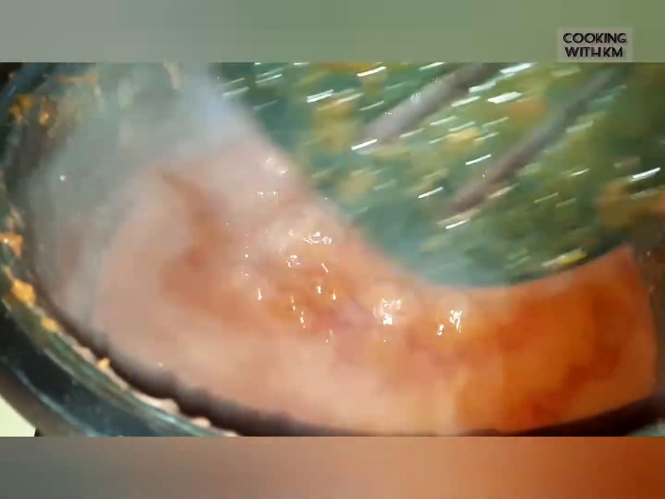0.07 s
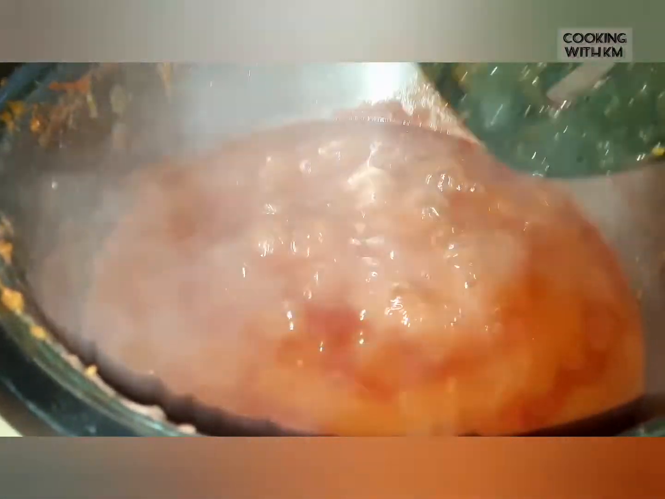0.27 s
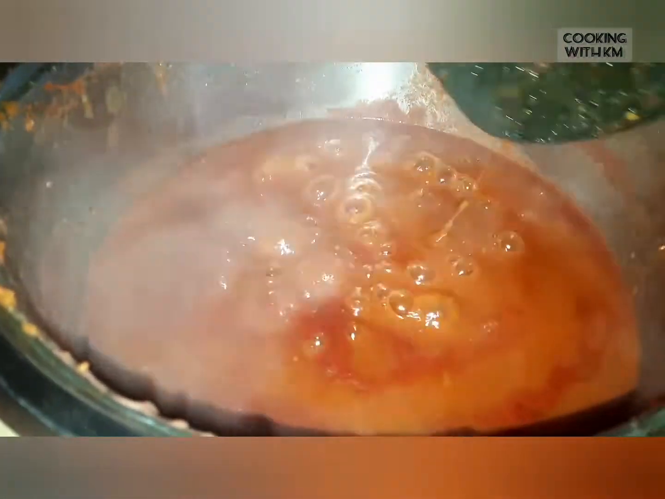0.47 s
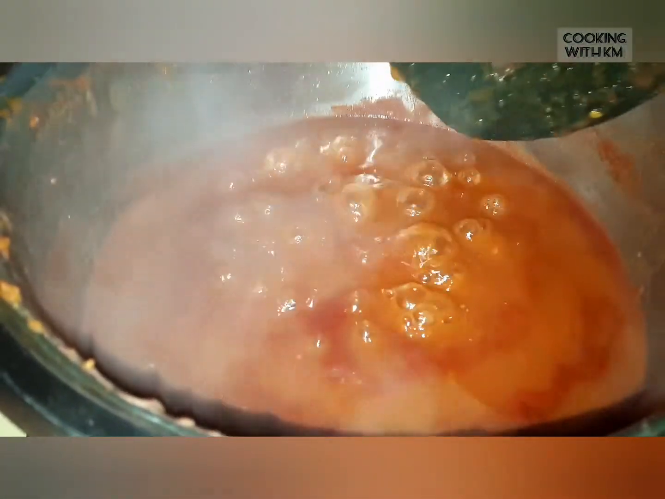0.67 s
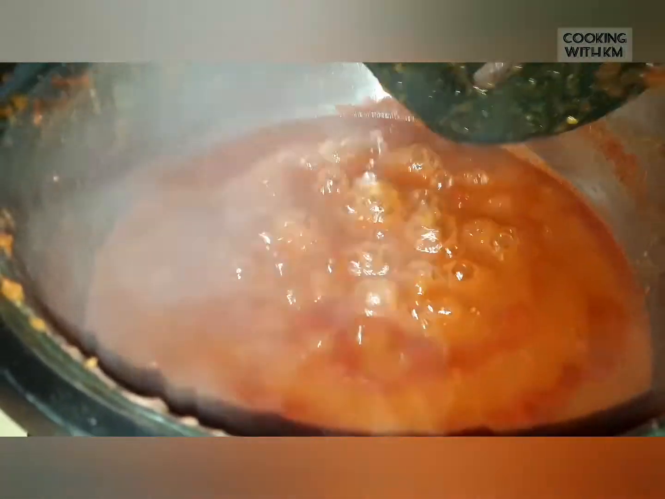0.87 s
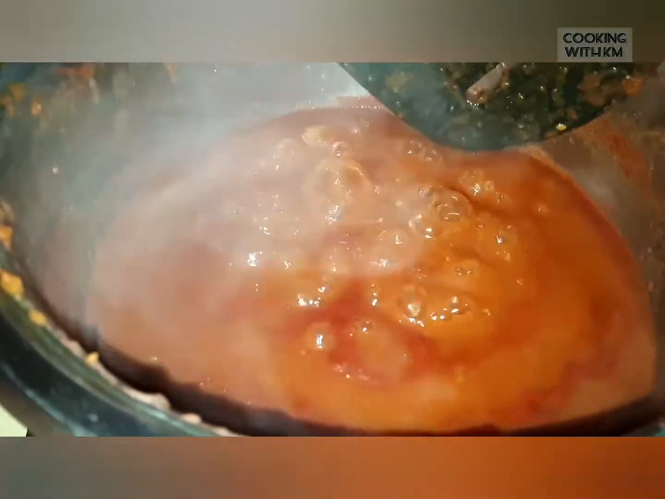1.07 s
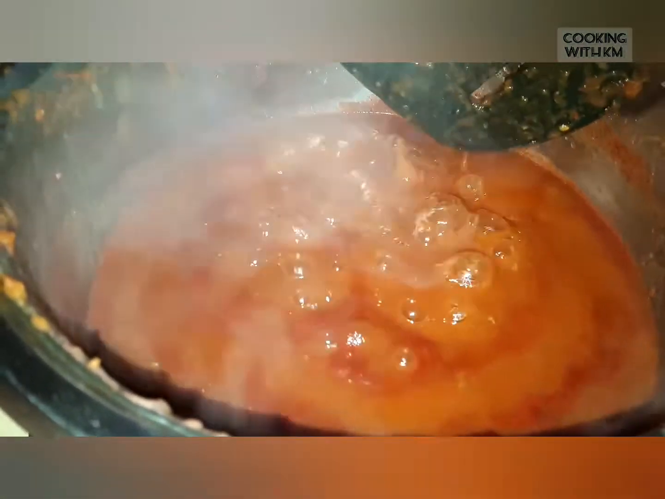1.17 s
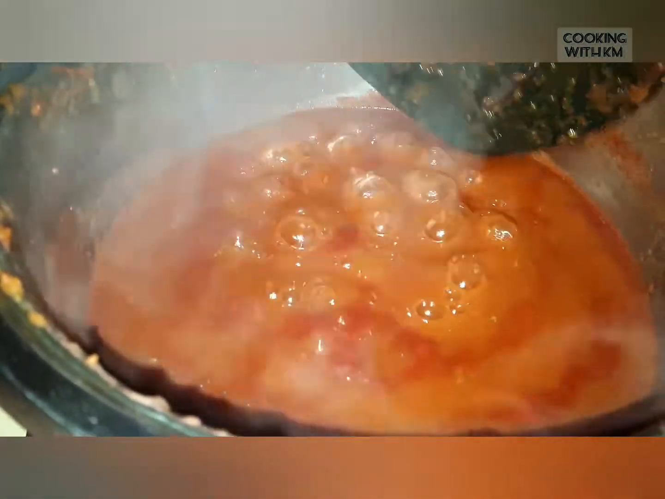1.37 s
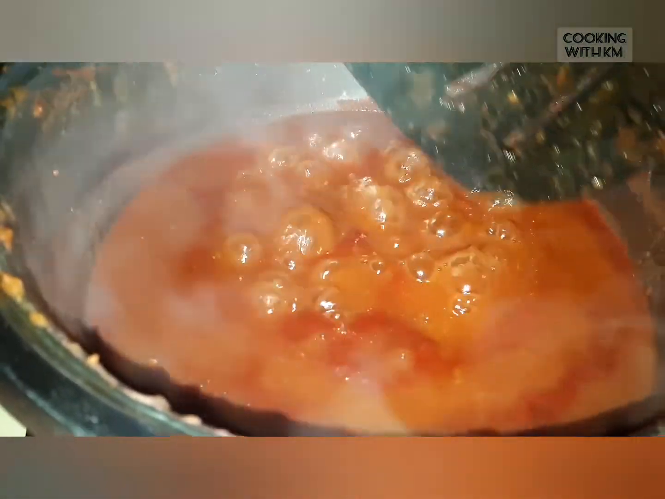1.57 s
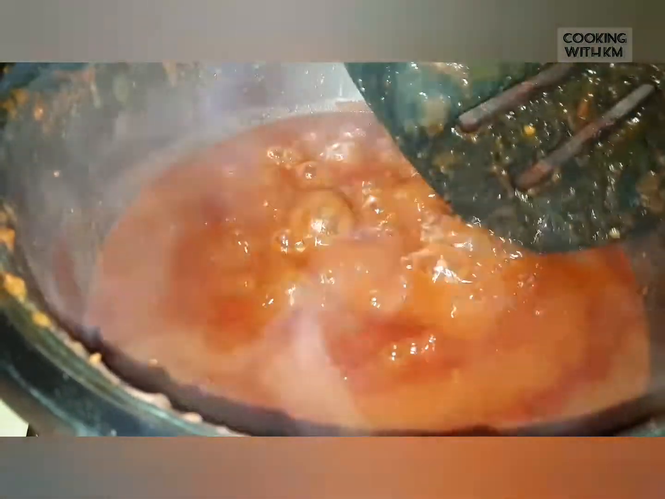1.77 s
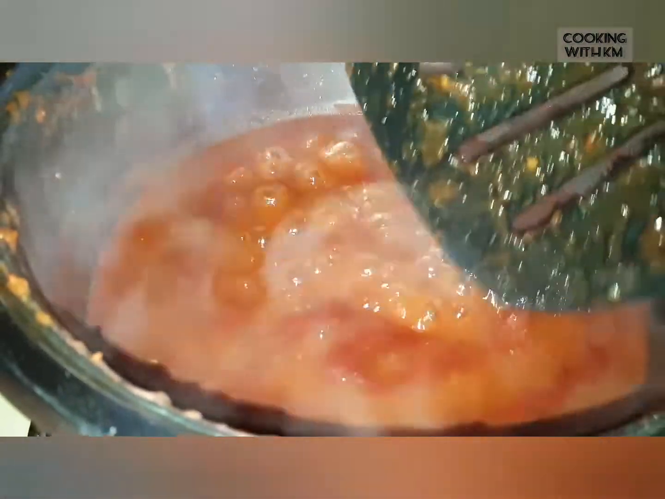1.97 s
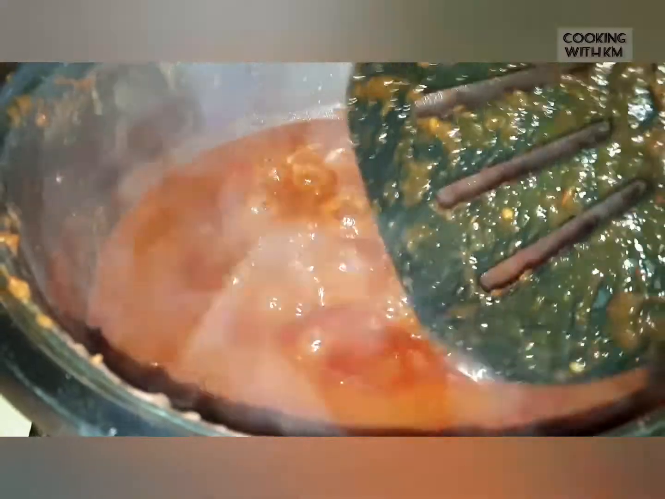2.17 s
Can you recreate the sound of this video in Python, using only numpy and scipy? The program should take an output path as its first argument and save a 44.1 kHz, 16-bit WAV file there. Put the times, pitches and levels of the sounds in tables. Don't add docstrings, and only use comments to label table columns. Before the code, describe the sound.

Thick sauce boils in an open pot, close up and leaning left: hollow bubble pops come unevenly, sparse at first, then strong and crowded near the end, over a low simmer and faint hiss in a kitchen.

```python
import sys
import numpy as np
from scipy import signal
from scipy.fft import rfft, irfft, next_fast_len
from scipy.io import wavfile
from scipy.ndimage import uniform_filter1d, map_coordinates

SR = 44100
rng = np.random.default_rng(int(sys.argv[2]) if len(sys.argv) > 2 else 0)


def master(y):
    cut = np.clip(np.atleast_2d(y).T, -1, 1)
    pcm = np.round(cut * 32767)
    wavfile.write(sys.argv[1], SR, pcm.astype(np.int16))


def undo_db(level):
    steps = np.asarray(level, float) / 20
    return 10 ** steps


N = 97328

POP_RISE_CYCLES, POP_LEFT_DB = 0.48, 7
PLIP_LEFT_DB = 3
TOP_HZ = 15850


def unit(x):
    return x / np.sqrt(np.mean(x ** 2) + 1e-20)


def along(points, hz):
    f, v = np.transpose(points)
    return np.interp(np.log(hz + 1), np.log(f + 1), v)


def wobble(rate):
    knots = rng.standard_normal(int(N * rate / SR) + 4)
    return map_coordinates(knots, [np.arange(N) * rate / SR])


def filtered(x, response):
    size = next_fast_len(N + SR // 4)
    hz = np.fft.rfftfreq(size, 1 / SR)
    return irfft(rfft(x, size) * response(hz), size)[..., :N]


def placed(start_s, shapes, lead, left_db):
    first = np.round(start_s * SR).astype(int)[:, None] - lead
    at = np.clip(first + np.arange(shapes.shape[-1]), 0, N)
    left = undo_db(np.clip(left_db, -14, 14) + 0 * start_s)
    gains = np.array([2 * left / (1 + left), 2 / (1 + left)])
    sides = shapes * gains[:, :, None]
    return np.array([np.bincount(at.ravel(), side.ravel(), N + 1)[:N] for side in sides])


def bubbles(start_s, level_db, pitch_hz, life, rise, left_db, skew=0., size=900):
    lead = size // 3
    cycles = (np.arange(size) - lead) / SR * pitch_hz[:, None]
    fall = np.clip(life + 0 * start_s, 0.65, 9)[:, None]
    swell = (rise + 0 * start_s)[:, None]
    growing = np.exp(-(cycles / swell) ** 2)
    dying = np.exp(1 - np.sqrt(1 + 3 * (cycles / fall) ** 2))
    shape = undo_db(level_db)[:, None] * np.where(cycles < 0, growing, dying)
    gliding = cycles + 0.037 * cycles * cycles / fall
    turn = np.multiply.outer([0.5, -0.5], skew + 0 * start_s)[:, :, None]
    return placed(start_s, shape * np.cos(2 * np.pi * gliding + turn), lead, left_db)


def spray(start_s, level_db, pitch_hz, count=9):
    draw, tone, side = rng.random((len(start_s), count, 3)).T
    late = -np.log(1 - 0.95 * draw)
    land_s = start_s + 0.014 * late
    drop_db = level_db - 10.5 - 8 * late
    drop_hz = pitch_hz * 2 ** (0.3 * (2 * tone - 1))
    left_db = PLIP_LEFT_DB - 4.5 + 14 * side
    return bubbles(land_s.ravel(), drop_db.ravel(), drop_hz.ravel(), life=2.2, rise=0.9,
                   left_db=left_db.ravel(), skew=(3 * side).ravel(), size=300)


# start_s, level_db (peak), pitch_hz, life_cycles
LARGE_BURSTS = [(0.11, -29, 374, 1.2), (0.1138, -27.5, 520, 1.4), (0.1295, -27.5, 903, 1.9),
                (0.1376, -41, 1086, 4.6), (0.1691, -35, 800, 0.7), (0.1726, -32, 730, 0.58),
                (0.1942, -32, 516, 1.55), (0.2623, -26, 704, 0.81), (0.2649, -31.5, 895, 1.7),
                (0.6476, -25.5, 520, 1.76), (0.707, -29.5, 620, 1.24), (0.7941, -35.5, 497, 4.2),
                (0.8383, -31, 653, 2.34), (0.925, -30, 686, 1.45), (1.0738, -23, 565, 1.55),
                (1.0774, -18.5, 776, 0.81), (1.3175, -36, 510, 4), (1.3715, -32.5, 476, 1.2),
                (1.523, -23, 983, 1.56), (1.533, -12.5, 980, 2.26), (1.5552, -23, 875, 0.74),
                (1.5459, -39, 1090, 2.9), (1.5673, -42, 1020, 7.8), (1.592, -40.5, 1000, 2.7),
                (1.5403, -32, 556, 2.7), (1.6758, -28, 844, 2.4), (1.6862, -30, 394, 0.53),
                (1.7272, -34, 516, 0.41), (1.7362, -30, 503, 0.9), (1.7452, -26.5, 590, 0.7),
                (1.748, -17, 836, 1.23), (1.7514, -27, 740, 0.52), (1.7559, -29, 850, 1.2),
                (1.8323, -32, 890, 1.35), (1.8393, -36, 1170, 1.2), (1.9388, -37.5, 520.0, 2.8),
                (2.0417, -34.5, 510, 0.8), (2.0471, -32, 520.0, 0.74), (2.071, -28.5, 800, 0.52),
                (2.1225, -33.5, 515, 2.1)]


def large_bursts():
    start_s, level_db, pitch_hz, life = np.transpose(LARGE_BURSTS)
    rise = POP_RISE_CYCLES + 0.08 * life
    pop = bubbles(start_s, level_db, pitch_hz, life, rise, POP_LEFT_DB)
    splash = spray(start_s, level_db - 17.5, 2.38 * pitch_hz)
    thump_hz = 210 + 0 * start_s
    thump = bubbles(start_s + 0.004, level_db - 28, thump_hz, life=1, rise=0.5, left_db=4, size=2400)
    return pop + splash + thump


# start_s, level_db (peak), pitch_hz
SMALL_BURSTS = [(0.0949, -37.5, 410), (0.0984, -33, 520.0), (0.2555, -33.5, 560), (0.3539, -35, 530),
                (0.4518, -38, 520.0), (0.5398, -36, 477), (0.6653, -39, 496), (0.6971, -34, 594),
                (0.731, -36.5, 730), (0.7365, -34.5, 820), (0.8247, -33.5, 546), (0.989, -37.5, 400),
                (1.091, -34.5, 940), (1.3078, -36, 540), (1.4213, -34.5, 473), (1.4635, -36, 520),
                (1.5006, -36.5, 520), (1.612, -35.5, 553), (1.8385, -45, 700), (2.0344, -38, 390),
                (0.016, -40, 520), (0.2255, -42, 434), (0.4155, -39.5, 520), (0.476, -42, 570),
                (0.631, -40, 560), (1.0425, -40, 477), (1.2165, -40, 550), (1.475, -41, 520),
                (1.799, -39, 554), (1.856, -47, 650), (2.0528, -45, 496), (2.0745, -40, 780)]


def small_bursts():
    start_s, level_db, pitch_hz = np.transpose(SMALL_BURSTS)
    return bubbles(start_s, level_db, pitch_hz, 1.6, POP_RISE_CYCLES, POP_LEFT_DB)


# start_s, level_db (peak), pitch_hz, life_cycles
THIN_PLIPS = [(0.398, -53, 1580, 10), (0.4299, -46, 2180, 1.1), (0.4618, -48.5, 2220, 3.7),
              (0.6162, -47.5, 2050, 1.9), (0.6165, -41.5, 1140, 2.8), (0.616, -54, 3460, 1.4),
              (0.6837, -47, 1920, 4.5), (1.1719, -39.5, 4070, 1), (1.3675, -45.5, 1920, 0.63),
              (1.4692, -30, 2815, 7.8), (1.4725, -36, 3020, 7.8), (1.5065, -53, 2950, 3.1),
              (1.469, -41, 4170, 3), (1.523, -27, 2500, 0.7), (1.5325, -40, 3820, 3.5),
              (1.5563, -36, 2030, 0.7), (1.657, -49, 2820, 2.3), (1.6752, -42, 2750, 0.57),
              (1.7478, -26, 2020, 1.9), (1.7481, -30.5, 2500, 6.7), (1.7585, -50, 2530, 5.4),
              (1.7646, -36.5, 2500, 5.4), (1.765, -37, 1800, 1.9), (1.773, -55, 2600, 4),
              (1.8375, -46, 3700, 4.5), (1.8372, -40, 2370, 1.9), (1.8405, -36.5, 2780, 3.1),
              (1.841, -37, 2070, 1), (1.935, -49, 2000, 3.2), (2.0662, -32, 1915, 6.5),
              (2.066, -48, 3000, 2.6), (2.071, -34, 2410, 1.8), (0.1295, -57, 2300, 3.6),
              (0.381, -55, 2750, 4.2), (0.4905, -50, 2300, 2.8), (0.557, -57, 2370, 2.5),
              (0.647, -54, 2020, 2.2), (2.094, -49, 2700, 2.2), (0.72, -60, 3200, 4),
              (1.256, -62, 3200, 2.2), (1.9965, -47, 2370, 1.7), (2.04, -56, 2000, 2.7)]


def plips():
    start_s, level_db, pitch_hz, life = np.transpose(THIN_PLIPS)
    place = rng.uniform(-0.57, 1, (len(start_s), 2))
    left_db = PLIP_LEFT_DB + 2.3 * place[:, 0]
    skew_rad = 0.98 * (1 + place[:, 1])
    plip = bubbles(start_s, level_db, pitch_hz, life, 0.73, left_db, skew_rad, size=600)
    return plip + spray(start_s, level_db, pitch_hz)


# start_s, level_db (peak), centre_hz, left_db (left over right)
SPAT_DROPLETS = [(0.3052, -48.5, 6950, 18.3), (0.3803, -51.5, 6330, 3), (0.3966, -50, 5500, 7.5),
                 (0.558, -48.5, 7040, 8), (0.9992, -54, 6840, -1), (1.1263, -43, 5440, 10),
                 (1.396, -50.5, 6850, 1), (1.469, -34.5, 5000, 0), (1.5227, -44, 5530, 5),
                 (1.8093, -52.5, 7250, 7), (1.98, -51, 8600, -18), (2.012, -53, 9110.0, -3),
                 (0.092, -57.5, 4170, 11), (0.284, -57, 4800, 12), (0.309, -60, 9000, 7),
                 (0.454, -53, 7700, 4), (0.625, -56, 7500, -4), (1.7639, -59, 4900, 1.5),
                 (1.8334, -54, 5000, -1.5), (2.0732, -55, 7600, -1.5), (2.11, -59, 7640, 1.5)]


def spits():
    start_s, level_db, centre_hz, left_db = np.transpose(SPAT_DROPLETS)
    size, lead = 512, 64
    t, hz = (np.arange(size) - lead) / SR, np.fft.rfftfreq(size, 1 / SR)
    centre = centre_hz[:, None]
    detune = hz / centre - centre / (hz + 1)
    colour = 1 / (1 + (1.64 * detune) ** 2) + undo_db(-17) * (hz > 0.8 * centre)
    noise = rng.standard_normal((2, len(start_s), size))
    rise_s, fall_s = 0.0004, 0.0019
    envelope = np.where(t < 0, np.exp(-(t / rise_s) ** 2), np.exp(-np.abs(t) / fall_s))
    crackle = irfft(rfft(noise) * colour) * envelope
    crackle = crackle / np.abs(crackle).max(axis=2, keepdims=True)
    return placed(start_s, undo_db(level_db + 1.5)[:, None] * crackle, lead, left_db)


# start_s, level_db (peak), pitch_hz
HEAVES = [(0.112, -42.5, 122), (0.411, -54, 122), (0.471, -54, 136), (0.54, -50.5, 117), (0.619, -51, 101),
          (0.701, -40.5, 116), (0.836, -42.5, 122), (0.991, -43, 124), (1.068, -44.5, 172),
          (1.29, -41, 193), (1.535, -39, 116), (1.606, -47, 110), (1.688, -41, 187.6), (2.042, -50, 114)]


def heaves():
    start_s, level_db, pitch_hz = np.transpose(HEAVES)
    return bubbles(start_s, level_db, pitch_hz, life=1.3, rise=1, left_db=2.5, size=4200)


def swarm(per_s, level_db, pitch_at, octaves, spread_db, life, left_db):
    draw = rng.random((int(per_s * N / SR), 2))
    bell = rng.standard_normal((len(draw), 2))
    start_s = draw[:, 0] * N / SR
    size_db = np.minimum(-spread_db * np.log(draw[:, 1] + 1e-9), 3 * spread_db)
    pitch_hz = pitch_at(start_s) * 2 ** (octaves * np.clip(bell[:, 0], -1.8, 1.25))
    side = bell[:, 1]
    skew_rad = pitch_hz / 2500 * side
    out = bubbles(start_s, size_db, pitch_hz, life, 0.37, left_db + 2 * side, skew_rad, size=600)
    return undo_db(level_db) * unit(out)


# centre_hz, width_hz, lift_db
POT_MODES = [(111, 72, 4), (508.4, 18, 6.5), (1085, 270, 4.5)]


def pot(x):
    def lift(f):
        return undo_db(sum(db * np.exp(-((f - hz) / wide) ** 2) for hz, wide, db in POT_MODES))
    return filtered(x, lift)


def murmur():
    return pot(swarm(800, -52.5, lambda at: 520, octaves=0.6, spread_db=3, life=1.96, left_db=7.1))


# start_s, effort_db, pitch_hz
FROTH = [
    (0.08, -2.5, 1510),
    (.2, 10.5, 1790),
    (.46, 2.5, 2240),
    (.75, -3.5, 2280),
    (1.1, 0.5, 2100),
    (1.19, 7.5, 4180),
    (1.35, 0.5, 2860),
    (1.8, 10.5, 2240),
    (2.2, 2, 2180),
]


def boil_effort_db():
    start_s, effort_db, _ = np.transpose(FROTH)
    return np.interp(np.arange(N) / SR, start_s, effort_db)


def froth():
    start_s, _, pitch_hz = np.transpose(FROTH)
    fizz = swarm(600, -75.5, lambda at: np.interp(at, start_s, pitch_hz), octaves=0.22,
                 spread_db=3.5, life=6, left_db=8.9)
    return undo_db(boil_effort_db()) * fizz


# frequency_hz, likeness [0-1]
LIKENESS = [(60, 0.96), (300, 0.98), (1000, 0), (9000, 0.03)]
# frequency_hz, left_db
SIDE_LEAN = [(50, 2), (600, 5.5), (3000, 2.5), (9000, 1.2)]


def rush(spectrum, patchy_db):
    z = signal.stft(rng.standard_normal((2, N)), nperseg=512)[2]
    patches = uniform_filter1d(rng.standard_normal(z.shape[1:]), 5, 0)
    patches = unit(uniform_filter1d(patches, 6, 1))
    pair = signal.istft(z * undo_db(patchy_db * patches), nperseg=512)[1][:, :N]

    def mid_side(hz):
        turn = np.arccos(np.clip(along(LIKENESS, hz), -1, 1)) / 2
        return undo_db(along(spectrum, hz)) * np.array([np.cos(turn), np.sin(turn)])

    def lean(hz):
        half_db = along(SIDE_LEAN, hz) / 2
        return undo_db([half_db, -half_db])

    mid, side = filtered(pair, mid_side)
    return unit(filtered(np.array([mid + side, mid - side]), lean))


# frequency_hz, density_db (per Hz)
SIMMER = [(24, -64), (40, -11.5), (135, 6.5), (453, -5.5), (551, 2), (909, -18.5), (1500, -48), (1950, -16),
          (3300, -120)]


def simmer():
    sway_db = wobble(25)
    return undo_db(-52 + sway_db) * unit(pot(rush(SIMMER, patchy_db=-0.3)))


def mains_hum():
    side_db = np.array([[0.9], [-0.9]])
    hum_hz = 56.4
    return undo_db(-63 + side_db) * np.sqrt(2) * np.sin(2 * np.pi * hum_hz * np.arange(N) / SR)


# frequency_hz, density_db (per Hz)
STEAM_HISS = [(760, -65), (1300, 4), (2480, -7), (3990, -6.5), (5660, -12.5), (7610, -11), (9010, -19),
              (15100, -14.5), (16300, -17)]


def hiss():
    drift_db, swell_db = 0.5 * wobble(20), 0.25 * boil_effort_db()
    steam = filtered(rush(STEAM_HISS, patchy_db=1.5), lambda hz: hz < TOP_HZ)
    return undo_db(-68 + swell_db + drift_db) * steam


# frequency_hz, t60_s
ROOM_DECAY = [(300, 0.11), (2000, 0.18), (10000, 0.25)]


def kitchen(x):
    out, size = np.zeros((2, N + SR)), 4096
    delay, share = round(0.004 * SR), 0.28
    for start in range(0, N, size):
        noise = rng.standard_normal((3, SR // 4))
        both = np.sqrt(share) * noise[2] + np.sqrt(1 - share) * noise[:2]
        hz, t, z = signal.stft(both, SR, nperseg=256)
        decay = undo_db(-60 * t / along(ROOM_DECAY, hz)[:, None])
        tail = signal.istft(z * decay, SR, nperseg=256)[1]
        tail = tail / np.linalg.norm(tail[0])
        wet = signal.fftconvolve(x[:, start:start + size], tail, axes=1)
        out[:, start + delay:][:, :wet.shape[1]] += wet
    return undo_db(-7.5) * out[:, :N]


def scene():
    bursts = large_bursts() + small_bursts() + plips() + heaves()
    near = bursts + spits() + murmur() + froth()
    steady = simmer() + mains_hum() + hiss()
    return near + kitchen(near) + steady


def roll_off(x):
    return signal.sosfilt(signal.butter(12, 16740, fs=SR, output="sos"), x)


def record(dry):
    def microphone(hz):
        port = undo_db(5 * np.exp(-((hz - 7700) / 260) ** 2))
        low_cut = hz ** 4 / (hz ** 4 + 42 ** 4)
        return port * low_cut * (hz < 1.03 * TOP_HZ)
    mix = filtered(dry, microphone)
    return roll_off(mix)


dry = scene()
out = record(dry)
master(out)
```